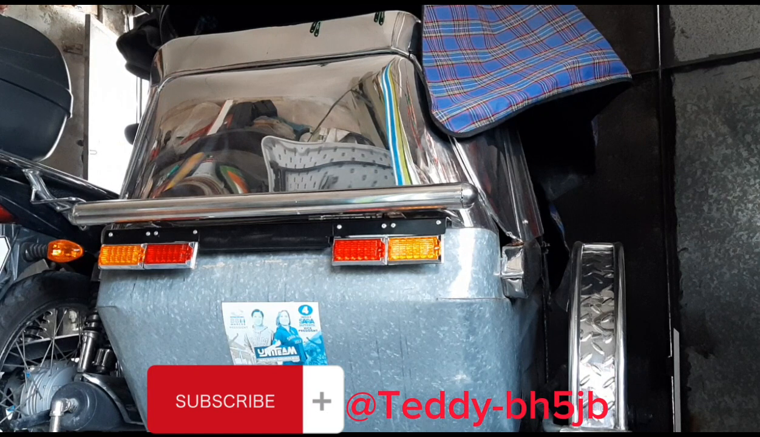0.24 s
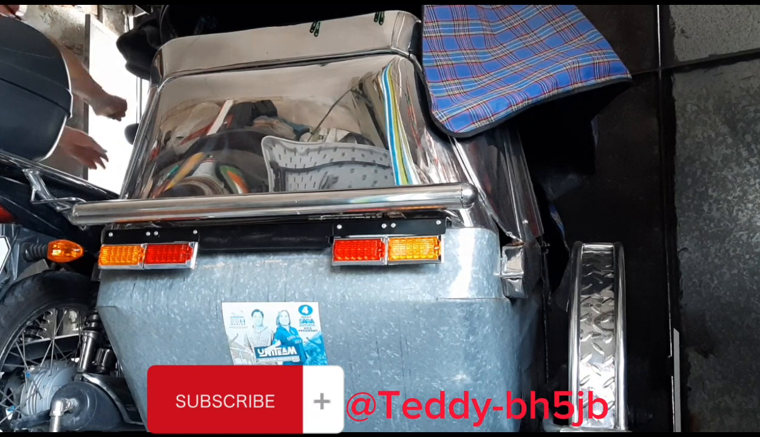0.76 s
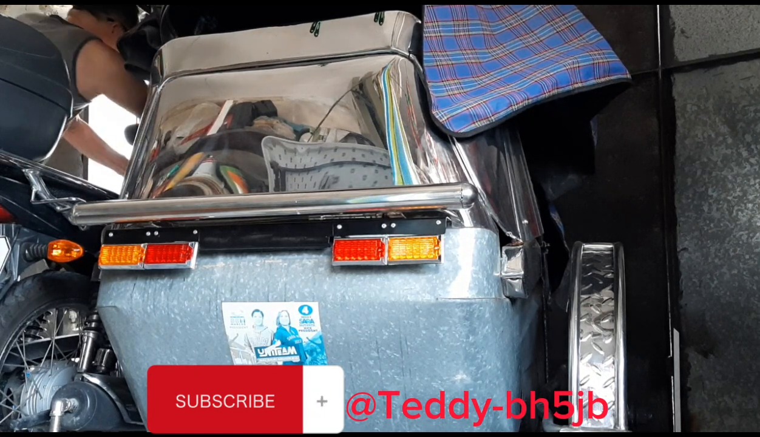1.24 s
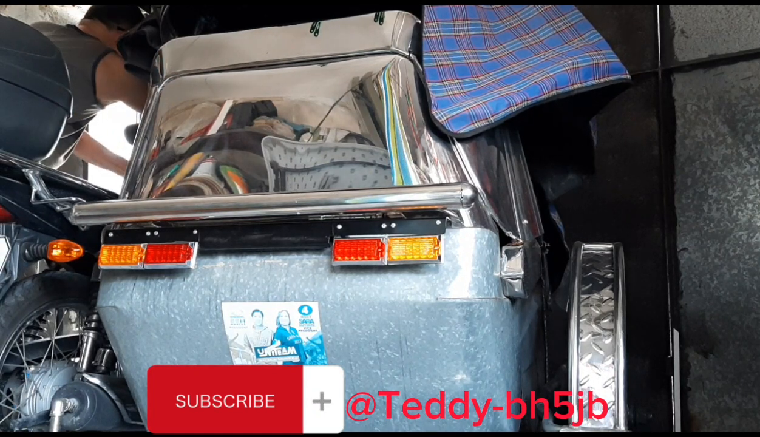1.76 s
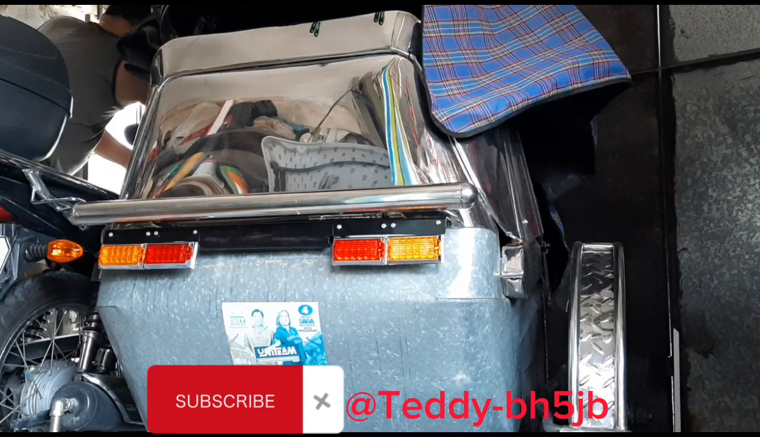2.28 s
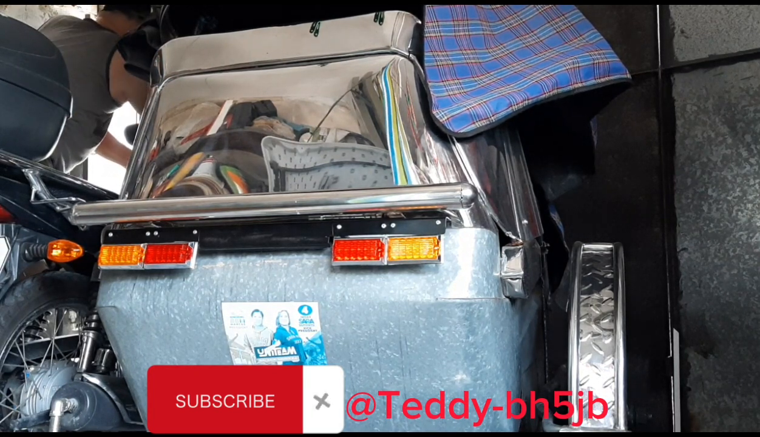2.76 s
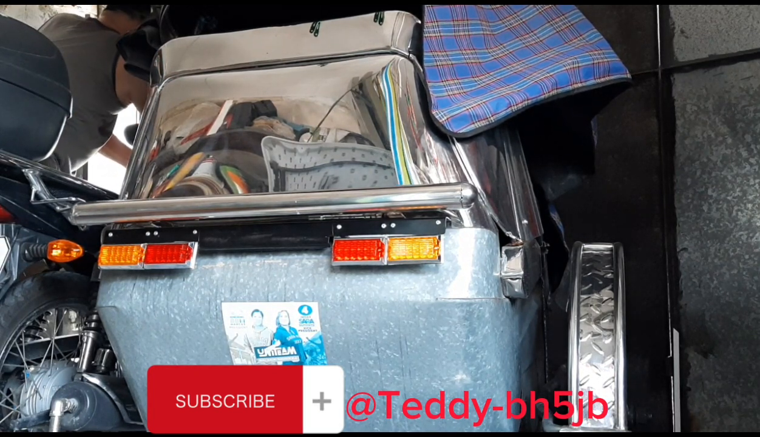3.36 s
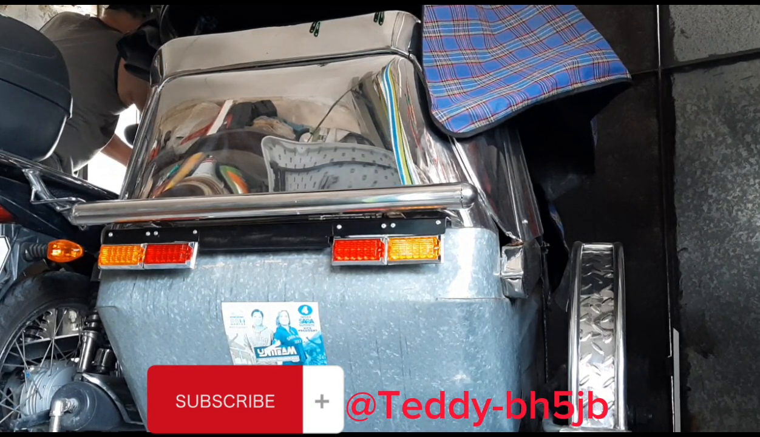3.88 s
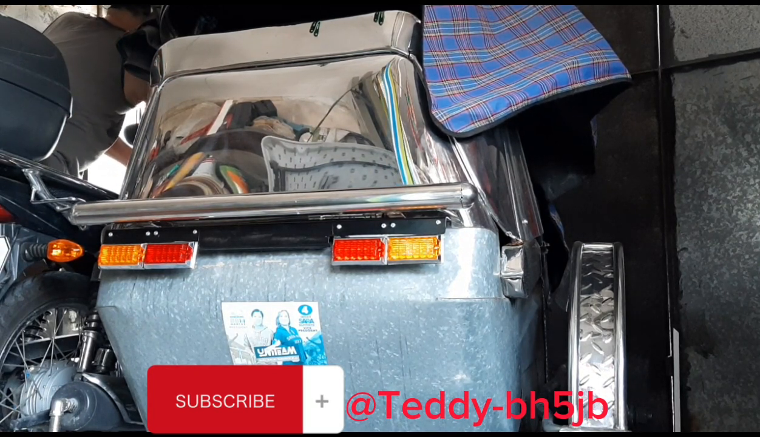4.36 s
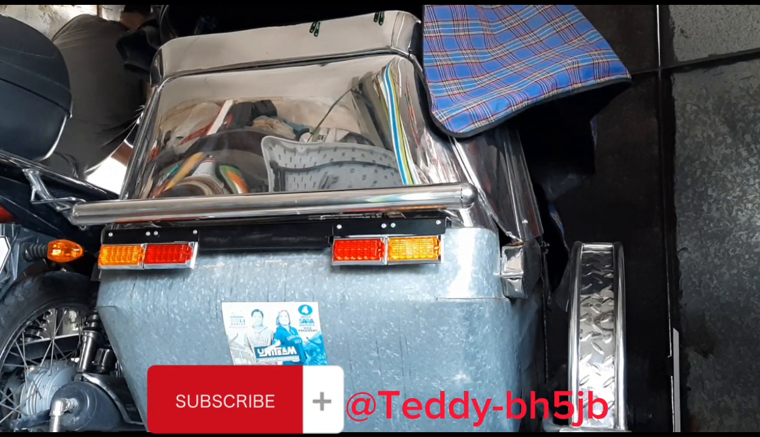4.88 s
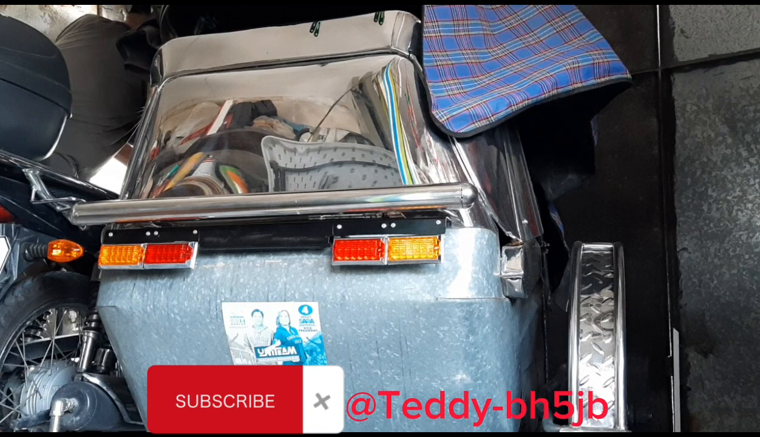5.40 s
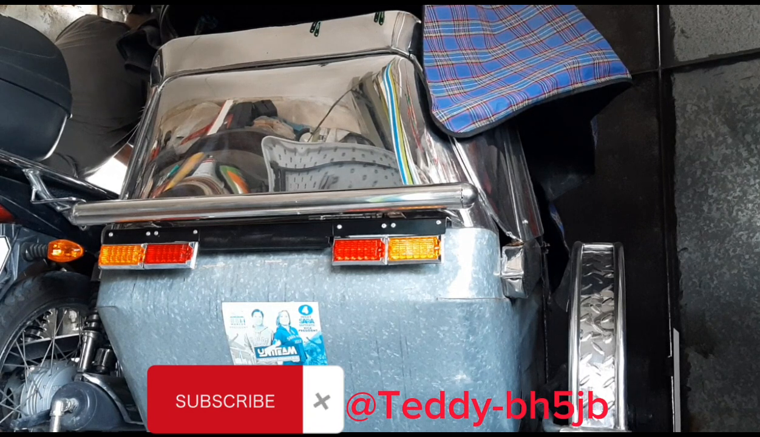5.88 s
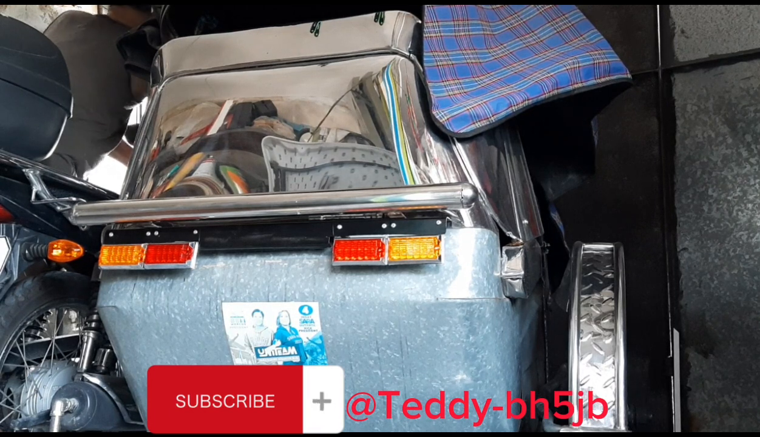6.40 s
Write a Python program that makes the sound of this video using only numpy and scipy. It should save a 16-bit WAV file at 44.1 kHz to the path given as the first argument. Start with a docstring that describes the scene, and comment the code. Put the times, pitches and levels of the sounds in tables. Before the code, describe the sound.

Thin spraying water flickers quietly above a distant traffic rumble, with brief rubbing scuffs and barely audible far toots. Late on, a motorcycle starter meshes abruptly, much louder than everything before, gritty and squealing for a fraction of a second. Low exhaust pulses follow at an uneven idle, with valve clatter and another cluster of short metal squeaks. Heard close by in open air, dry, in stereo.

```python
"""A small motorcycle is started on a wet yard: each firing rings the silencer at a low damped note.
The starter grinds first; metal squeals, of two fluttering partials, come then and again among the firings.
Dense impacts, modelled as noise shaped by case modes, make the starter gears and then the valve clatter.
Behind lie uneven spurts of water, far traffic and a street wash, all coloured noise, with
rubs of banded noise as the rider shifts about and a few faint far toots made of pure tones."""
import sys
import numpy as np
from scipy import signal
from scipy.io import wavfile
from scipy.ndimage import uniform_filter1d

SR = 44100
rng = np.random.default_rng(int(sys.argv[2]) if len(sys.argv) > 2 else 0)


def unload_audio(sound):
    """Save the sound as a 16-bit wav file, at the path given as the first command line argument."""
    columns = np.transpose(np.atleast_2d(sound))
    # keep every value between -1 and 1, then stretch to whole-number steps
    steps = np.round(np.clip(columns, -1, 1) * 32767)
    wavfile.write(sys.argv[1], SR, steps.astype(np.int16))


N = 293265


def gain_of(db):
    """Logarithmic level: converts decibels to an amplitude ratio."""
    return 10 ** (np.asarray(db) / 20)


def evened(x):
    """Normalisation: scales a signal to an rms of 1."""
    return x / np.sqrt(np.mean(x ** 2) + 1e-20)


def read(points, hz):
    """Spectral interpolation: reads a table along a logarithmic frequency axis."""
    point_hz, value = np.transpose(points)
    return np.interp(np.log(hz + 1), np.log(point_hz + 1), value)


def add(mix, start_s, sound):
    """Superposition: adds a sound to the mix from its start time, cut at the end."""
    part = mix[:, round(start_s * SR):][:, :sound.shape[1]]
    part += sound[:, :part.shape[1]]


def level(rows, column=1):
    """Amplitude envelope: one dB column, interpolated over time, as a gain for every sample."""
    columns = np.transpose(rows)
    return gain_of(np.interp(np.arange(N) / SR, columns[0], columns[column]))


def wander(depth_db, slow_hz, fast_hz):
    """Random modulation: a gain from sines of random phase, log-spread in rate, of rms depth_db."""
    hz = np.geomspace(slow_hz, fast_hz, num=24)[:, None]
    t = np.arange(0, N + 256, 256) / SR
    phase = 2 * np.pi * (hz * t + rng.random(hz.shape))
    flicker = evened(np.sin(phase).sum(axis=0))
    return gain_of(depth_db * np.interp(np.arange(N) / SR, t, flicker))


# likeness of the left and right sound: frequency_hz, likeness (1 = identical)
LIKENESS = [(60, 1), (180, 0.96), (350, 1), (480, 0.85), (650, 0.45), (1000, 0.097), (2000, 0.027)]
RIGHT_LAG_S = 0.00036  # sound reaches the right port later


def noise(shape_db, side, count, size, patchy_db, ripple_db=0):
    """Interchannel coherence: noise of spectrum shape_db(hz, s), most alike in both ears in the bass."""
    frames, hz = count * 4 // size + 5, np.fft.rfftfreq(size, 1 / SR)[:, None]
    a, b, c, d, patches = rng.standard_normal((frames, len(hz), 5)).T
    # random patches in time and frequency
    patches = uniform_filter1d(patches, size=9, axis=0)
    patches = evened(uniform_filter1d(patches, size=9, axis=1))
    # fixed random unevenness of the spectrum, separate for each ear
    ripple = evened(uniform_filter1d(rng.standard_normal((2, len(hz), 1)), size=2, axis=1))
    same = np.clip(read(LIKENESS, hz), -1, 1)
    left, other = a + 1j * b, c + 1j * d
    late = np.exp(-2j * np.pi * hz * RIGHT_LAG_S)
    spectrum = np.array([left, same * late * left + np.sqrt(1 - same ** 2) * other])
    lean_db = read(side, hz) / 2
    frame_s = np.arange(frames) * size / 4 / SR
    colour_db = shape_db(hz, frame_s) + patchy_db * patches + ripple_db * ripple
    spectrum *= gain_of(np.array([lean_db, -lean_db]) + colour_db)
    sound = signal.istft(spectrum, nperseg=size, noverlap=size * 3 // 4)[1]
    return evened(sound[:, :count])


# points of the level curves of spray and far traffic: time_s, level_db (before the random flicker)
SPRAY = [(0.0, -43), (0.15, -40.5), (0.27, -44.5), (0.53, -40.5), (0.7, -45), (1.33, -37.5), (1.38, -35.5),
         (2.3, -40), (2.55, -39.5), (2.6, -44.5), (2.66, -39), (2.7, -43.5), (3.04, -38), (3.38, -44),
         (3.44, -38), (3.56, -45.5), (3.61, -39.5), (3.86, -43.5), (3.96, -39), (4.02, -45.5), (4.33, -38),
         (4.36, -41.5), (5.03, -41.5), (5.33, -38)]
TRAFFIC = [(0.0, -52.5), (2.7, -51.5), (2.89, -49.5), (3.25, -55), (5.3, -52)]
# relative spectra of spray, traffic and steady street wash: frequency_hz, density_db (dB per Hz)
SPRAY_COLOUR = [(1500, -21.5), (2260, -11), (3020, -7), (4130, -3), (6390, 0), (7600, 1.5), (9400, -1),
                (11800, 2), (13400, -1), (15000, 1), (15500, -5)]
TRAFFIC_COLOUR = [(15, -50), (25, -10), (54, -7), (101, 4.5), (127, -5.5), (146, -22), (167, -10),
                  (241, -8), (380, -18.5), (490, -60), (840, -120)]
WASH_COLOUR = [(210, -21), (350, -9.5), (442, -3.5), (950, 0.5), (1250, -3), (1520, -1.5), (1680, -6.5),
               (2000, -4), (4000, -11), (5200, -36), (8800, -120)]
# sideways balance of the yard: frequency_hz, left_minus_right_db
YARD_SIDE = [(60, -3), (240, -2), (950, -2), (3770, -1), (15000, -5)]
WASH_DB = -54


def yard():
    """Spectral shaping: spray and traffic are coloured noise on random swells, over a steady wash."""
    spray = noise(lambda hz, s: read(SPRAY_COLOUR, hz), YARD_SIDE, N,
                  size=1024, patchy_db=1.47, ripple_db=1.0)
    traffic = noise(lambda hz, s: read(TRAFFIC_COLOUR, hz), YARD_SIDE, N, size=2048, patchy_db=-0.25)
    wash = noise(lambda hz, s: read(WASH_COLOUR, hz), YARD_SIDE, N,
                 size=2048, patchy_db=1.0, ripple_db=3.0)
    spray = spray * level(SPRAY) * wander(depth_db=1.16, slow_hz=4.5, fast_hz=13)
    traffic = traffic * level(TRAFFIC) * wander(depth_db=1.57, slow_hz=1.172, fast_hz=9.4)
    return spray + traffic + wash * gain_of(WASH_DB)


# faint far toots: start_s, level_db (mean of the ears), pitch_hz, length_s
TOOTS = [(0.782, -52, 604, 0.15), (1.68, -49, 828, .04), (1.717, -54, 655, 0.13)]


def toots():
    """Pure tones: each toot is one sine under a smooth swell, 3 dB stronger at the right."""
    out, t = np.zeros((2, N)), np.arange(SR // 3) / SR
    for start_s, level_db, pitch_hz, length_s in TOOTS:
        swell = np.sin(np.pi * np.minimum(t / length_s, 1) ** 0.7) ** 1.3
        tone = np.sin(2 * np.pi * pitch_hz * t) * swell
        add(out, start_s, gain_of(level_db) * tone * gain_of([[-1.5], [1.5]]))
    return out


# scuffs as the rider moves: start_s, level_db (before rise and decay), centre_hz,
# width_octaves (from the centre to 6.1 dB down), rise_s
SCUFFS = [(1.413, -43, 302, 1.7, 0.0023), (1.448, -47, 1487, 0.045, 0.0047),
          (1.618, -47, 1500, 0.24, 0.0091), (1.699, -45.5, 1470, 0.31, 0.0081),
          (2.075, -46.5, 760, 0.5, 0.0091), (2.095, -39.5, 2200, 2.3, 0.01), (2.42, -48, 1110, 0.85, 0.014),
          (2.90, -41, 1600, 1.3, 0.019), (2.952, -35.5, 1800, 0.92, .006),
          (4.213, -34.5, 1630, 0.64, 0.017), (4.266, -42.5, 1250, 1.1, 0.0075)]
SCUFF_T60_S = 0.33  # time to decay by 60 dB


def rider():
    """Friction noise: each rub is a band of noise that rises fast and decays exponentially."""
    out, t = np.zeros((2, N)), np.arange(SR // 3) / SR
    for start_s, level_db, centre_hz, width_octaves, rise_s in SCUFFS:
        band = lambda hz, _: -6.1 * (np.log2((hz + 1) / centre_hz) / width_octaves) ** 2
        rub = noise(band, YARD_SIDE, len(t), size=1024, patchy_db=1.2, ripple_db=2.5)
        decay = gain_of(level_db - 60 * t / SCUFF_T60_S)
        add(out, start_s, rub * decay * np.minimum(t / rise_s, 1))
    return out


# points of the level curves of starter gears, then valve gear and chain:
# time_s, level_db, fizz_level_db (treble)
CLATTER = [(5.35, -28, -27), (5.378, -25.5, -38), (5.472, -20, -26), (5.556, -24.5, -32.5),
           (5.58, -20, -22.5), (5.636, -26, -34.5), (5.694, -31, -49), (6.074, -30, -55), (6.19, -26, -37),
           (6.204, -24, -27), (6.254, -27, -40), (6.272, -21, -28.5), (6.312, -26, -36.5),
           (6.504, -30, -52), (6.65, -31, -48)]
# broad colour of the case (before tilt) and colour of the fizz: frequency_hz, density_db (dB per Hz)
CASE = [(71, -9), (120, -6.5), (281, -12.5), (350, -5), (395, -12), (584, -8.5), (636, -11.5), (956, -8),
        (1230, -14), (1490, -12.5), (2020, -3.5), (5100, -15), (5800, -18.5), (7000, -25), (9100, -30),
        (15400, -120)]
FIZZ = [(2940, -22), (5000, 2.5), (5720, -7), (6400, 1), (8190, 0), (8660, -6.5), (12000, -2), (15200, -18)]
# ringing modes of the case: frequency_hz, nominal_width_hz, relative_level_db (before lift and shake)
CASE_MODES = [(344, 15, -11.5), (1020, 21, -17), (1280, 57, -6.5), (1490, 160, -8.5), (2070, 95, -7),
              (2390, 40, -9), (3300, 40, -3.5), (4270, 140, -9), (4500, 22, -5), (4870, 61, -12),
              (6140, 19, -28), (6730, 12, -29), (6860, 18, -32)]
# sideways balance of the motorcycle: frequency_hz, left_minus_right_db
BIKE_SIDE = [(60, -1), (240, -1), (950, -1.5), (3770, -0.5), (15000, -3.5)]
ENGAGE_S, ENGAGE_RISE_S = 5.345, 0.0048  # the starter gear meshes
IDLE_DB = -30  # level of the clatter at idle
IDLE_TILT_DB, TILT_DB_PER_DB = 0.22, 0.31  # dB per octave at idle, and its growth per dB of level
BODY_HZ, BODY_OCTAVES, BODY_DB = 1000, 0.45, 4.3  # housing that sings while the starter turns
RUN_OUT_S = (5.75, 5.89)  # the starter spins down: its housing resonance fades between these times


def case_db(hz, s):
    """Modal resonance: a broad case spectrum plus ringing peaks, brighter under harder impacts."""
    # each mode is shaken harder or softer from moment to moment
    shake = rng.standard_normal((len(s), len(CASE_MODES)))
    shake_db = 1.6 * evened(uniform_filter1d(shake, size=8, axis=0)).T
    peaks = 0
    for (mode_hz, width_hz, mode_db), shake in zip(CASE_MODES, shake_db):
        peaks = peaks + gain_of(2 * (mode_db + shake)) / (1 + ((hz - mode_hz) / (0.36 * width_hz)) ** 2)
    load_db = np.interp(s, *np.transpose(CLATTER)[:2]) - IDLE_DB
    tilt_db = IDLE_TILT_DB + TILT_DB_PER_DB * load_db
    broad_db = read(CASE, hz) + tilt_db * np.log2((hz + 1) / 2000)
    starter_turning = np.interp(s, RUN_OUT_S, (1, 0))
    housing_db = BODY_DB * np.exp(-(np.log2((hz + 1) / BODY_HZ) / BODY_OCTAVES) ** 2) * starter_turning
    power = gain_of(2 * broad_db) + gain_of(2 * 1.4) * peaks  # doubled dB give power; peaks lifted 1.4 dB
    return 10 * np.log10(power) + housing_db


def clatter():
    """Impact noise: dense small blows, as noise through the case, with treble fizz and random rattle."""
    body = noise(case_db, BIKE_SIDE, N, size=2048, patchy_db=0.6, ripple_db=3.5)
    fizz = noise(lambda hz, s: read(FIZZ, hz), BIKE_SIDE, N, size=1024, patchy_db=1.4, ripple_db=3.0)
    rattle_db = evened(uniform_filter1d(rng.standard_normal(N), size=120))  # 1 dB rms
    rattle = evened(gain_of(rattle_db))
    engaged = np.clip((np.arange(N) / SR - ENGAGE_S) / ENGAGE_RISE_S, 0, 1)
    return (body * level(CLATTER) + fizz * level(CLATTER, column=2)) * rattle * engaged


# squeals of slipping metal: start_s, level_db (low partial, before flutter), length_s,
# low_hz, high_hz, high_above_low_db
SQUEALS = [(5.356, -36.5, 0.071, 447, 1307, 3.5), (5.395, -32.5, 0.02, 1510, 3360, 5.5),
           (5.455, -38, 0.12, 348.4, 844, 2), (5.462, -25.5, 0.098, 1068, 2150, 2),
           (5.49, -37, 0.076, 2150, 4360, 9), (5.563, -18, 0.058, 1317, 5100, -11),
           (5.576, -21.5, 0.065, 2406, 4800, -9), (5.665, -42.5, 0.14, 343.7, 980, 2),
           (6.123, -31, 0.038, 441, 820, -5), (6.195, -24.5, 0.056, 1503, 2840, -4),
           (6.263, -26, 0.049, 1297, 2400, 4), (6.32, -40.5, 0.18, 348.4, 2087, 9.5)]


def squeals(rough=0.5):
    """Stick-slip: tones of two partials with a fluttering level, most alike in both ears when low."""
    out, t = np.zeros((2, N)), np.arange(SR // 5) / SR
    for start_s, level_db, length_s, low_hz, high_hz, high_db in SQUEALS:
        hz = np.array([[low_hz], [high_hz]])
        real, imag = uniform_filter1d(rng.standard_normal((2, 2, 2, len(t))), size=300)
        flutter = rough * (real + 1j * imag) / real.std()
        left, other = np.array([[[1]], [[1j]]]) + flutter
        same = np.clip(read(LIKENESS, hz), -1, 1)
        drive = np.array([left, same * left + np.sqrt(1 - same ** 2) * other])
        tones = (drive * np.exp(2j * np.pi * hz * t)).real * gain_of([[0], [high_db]])
        swell = np.sin(np.pi * np.minimum(t / length_s, 1) ** 0.4)
        add(out, start_s, gain_of(level_db) * tones.sum(axis=1) * swell)
    return out


# firings heard at the tail pipe: start_s, peak_db (of the swell, mean of the ears), pitch_hz
FIRINGS = [(5.607, -19, 90), (5.658, -21.5, 81), (5.717, -23.5, 86.6), (5.756, -22, 85.7), (5.824, -27, 74),
           (5.877, -24.5, 85), (5.959, -24, 82), (6.039, -24, 83), (6.101, -25.5, 69.2), (6.162, -27.5, 81),
           (6.236, -39, 78), (6.293, -22, 84.7), (6.368, -24, 83), (6.423, -26.5, 70), (6.495, -27, 81.6),
           (6.576, -23.5, 81.5)]
SWELL_S = 0.014  # time constant of the filling silencer
# the 60 dB decay is short at the catch and lengthens as the idle settles
T60_S, T60_GAIN_S, WARM_S = 0.08, 0.13, 0.12  # at the catch, most it gains, time constant


def exhaust():
    """Damped resonance: each firing fills the silencer, which swells and rings at its low note."""
    out, t = np.zeros((2, N)), np.arange(SR // 3) / SR
    t = np.maximum(t - np.array([[0], [RIGHT_LAG_S]]), 0)
    for start_s, peak_db, pitch_hz in FIRINGS:
        since_catch_s = start_s - FIRINGS[0][0]
        t60_s = T60_S + T60_GAIN_S * (1 - np.exp(-since_catch_s / WARM_S))
        swell = (1 - np.exp(-t / SWELL_S)) ** 3 * gain_of(-60 * t / t60_s)
        overtone = gain_of(-25) * np.sin(2 * np.pi * 2.1 * pitch_hz * t)
        ring = np.sin(2 * np.pi * pitch_hz * t) + overtone
        add(out, start_s, gain_of(peak_db) * ring * swell / swell.max() * gain_of([[-0.9], [0.9]]))
    return out


def scene():
    """Superposition: all sources summed at the two microphones."""
    return yard() + toots() + rider() + clatter() + squeals() + exhaust()


PORT_HZ, PORT_WIDTH_HZ, PORT_DB = 1561, 70, 5.9  # resonance of the microphone port
BASS_CUT_HZ, EDGE_HZ = 42, 15500


def record(dry):
    """Linear filtering: the microphone port lifts a narrow band, then deep bass and top are cut."""
    port = signal.lfilter(*signal.iirpeak(PORT_HZ, PORT_HZ / PORT_WIDTH_HZ, SR), dry)
    heard = dry + (gain_of(PORT_DB) - 1) * port
    heard = signal.sosfilt(signal.butter(3, BASS_CUT_HZ, "high", fs=SR, output="sos"), heard)
    edge = signal.firwin(2047, EDGE_HZ, window=("kaiser", 9), fs=SR)
    return signal.oaconvolve(heard, edge[None], "same")


dry = scene()
out = record(dry)
unload_audio(out)
```